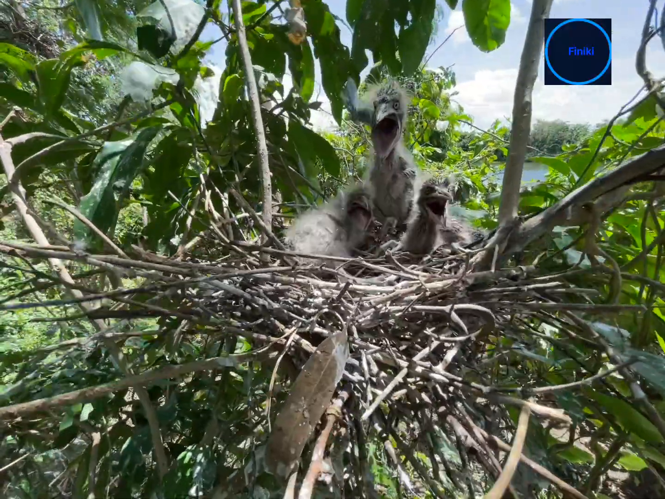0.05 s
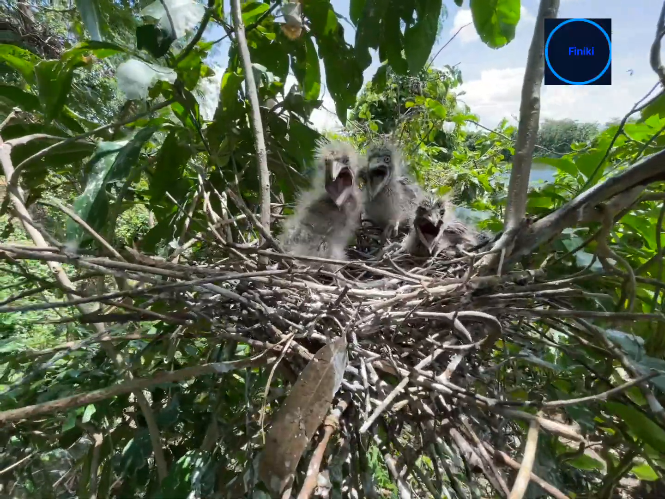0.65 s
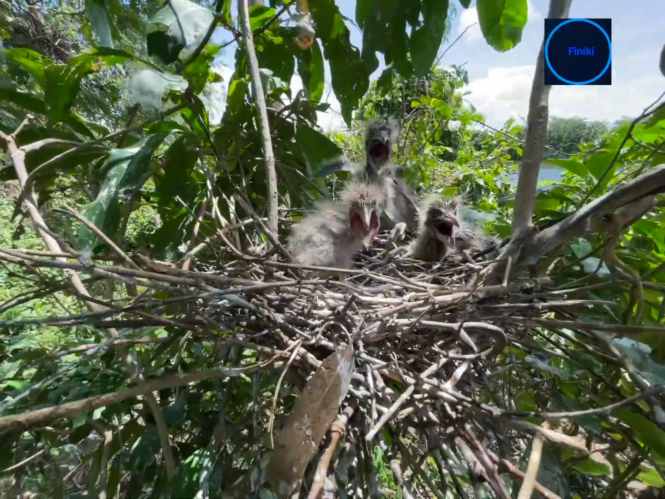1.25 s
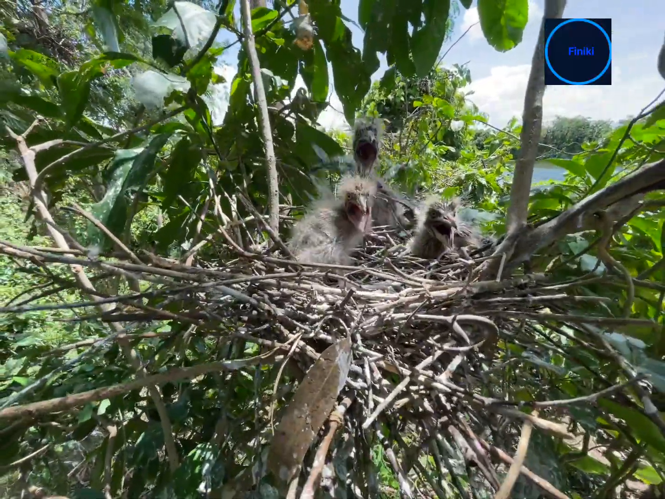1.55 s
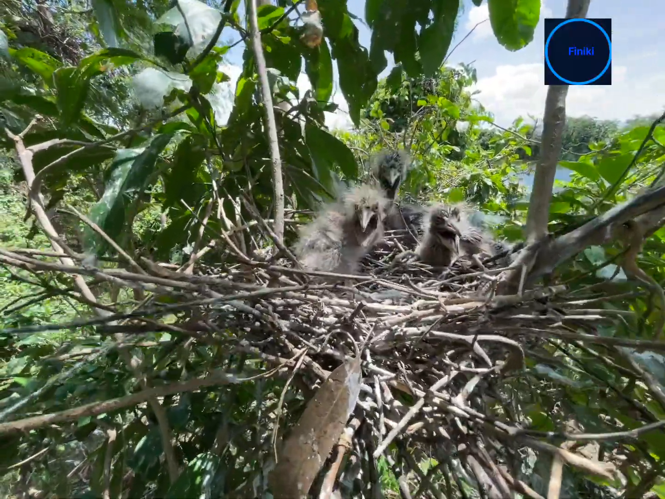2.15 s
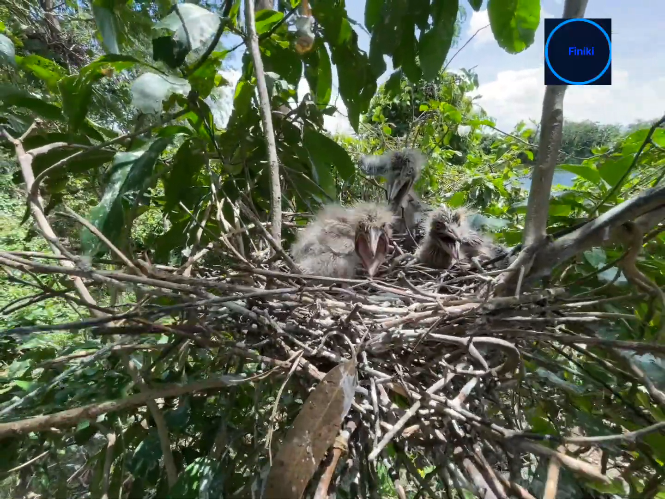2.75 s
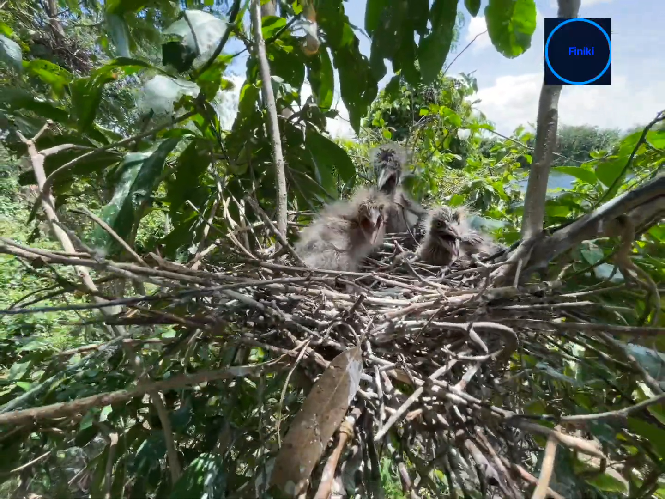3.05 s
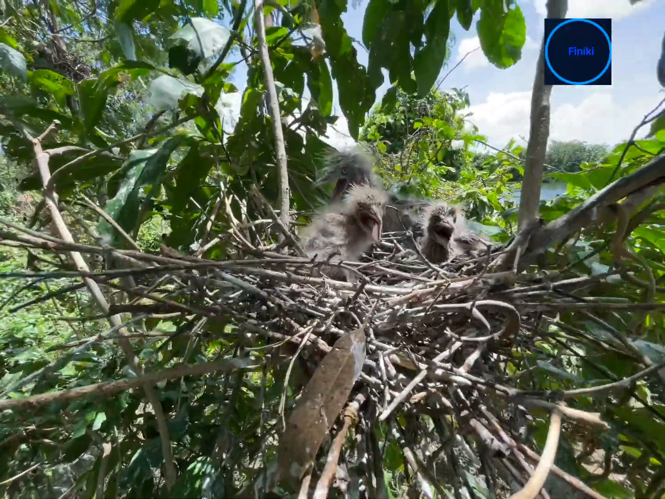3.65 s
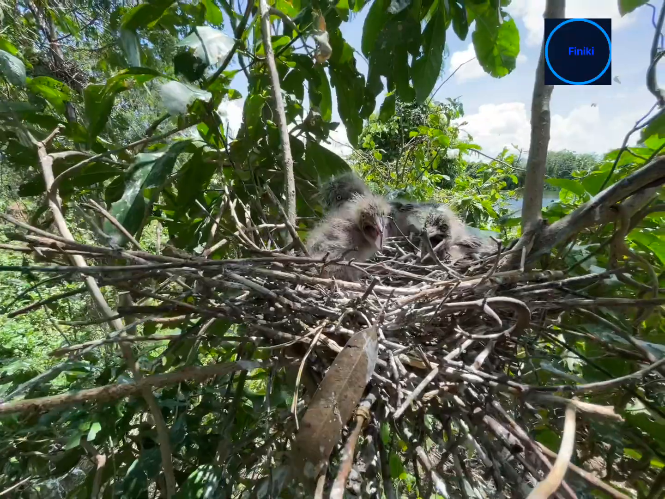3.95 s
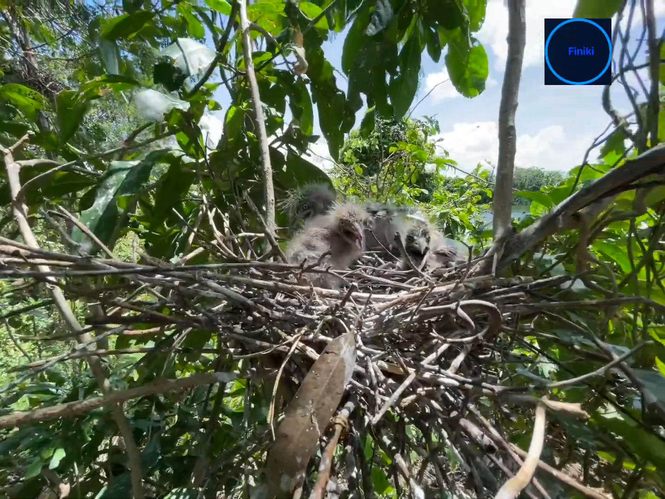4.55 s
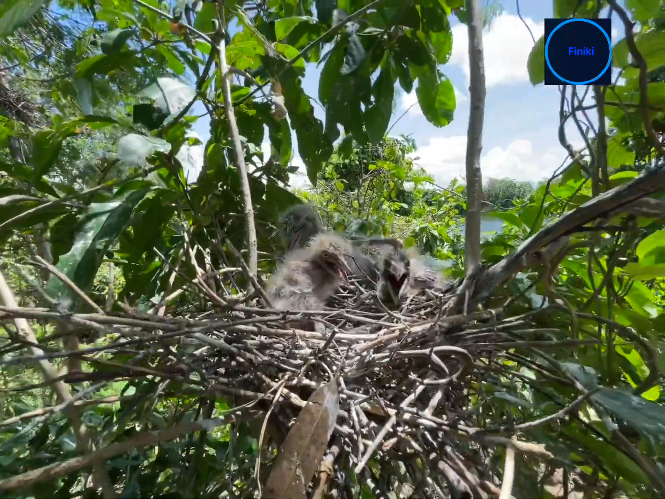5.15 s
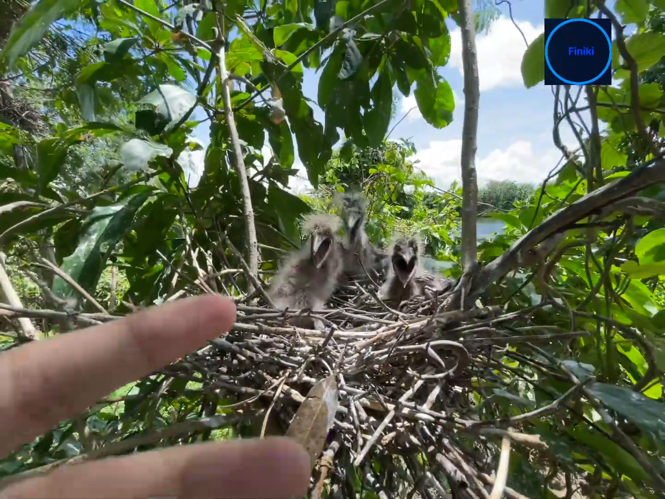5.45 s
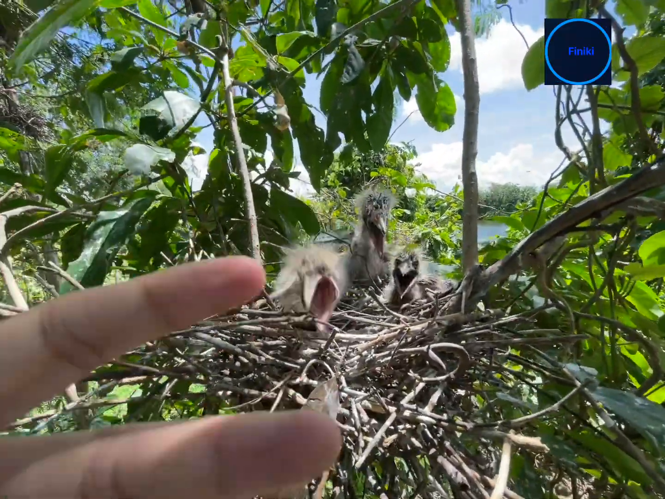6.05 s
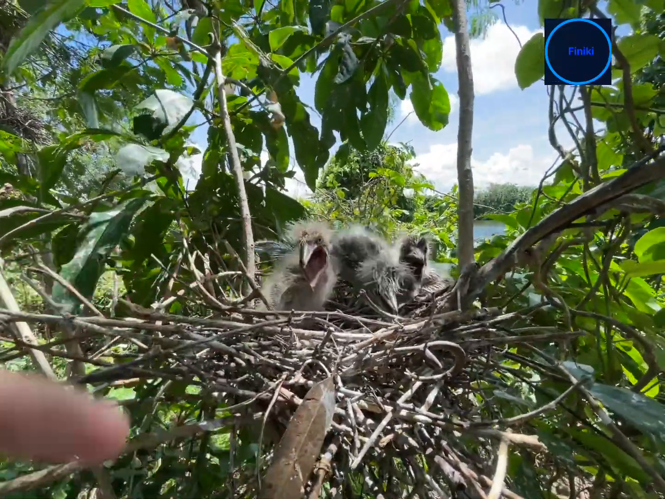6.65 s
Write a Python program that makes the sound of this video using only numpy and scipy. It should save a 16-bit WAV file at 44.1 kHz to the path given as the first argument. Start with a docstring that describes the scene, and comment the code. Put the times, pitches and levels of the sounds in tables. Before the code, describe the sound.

Heron chicks beg in a stick nest right by the microphone. One short, harsh yelp comes early; after a quiet stretch, a longer screech and a quick squawk follow near the end. Between them, twigs tick and down rustles faintly as the chicks shuffle. Soft grunts and hisses echo from a farther nest, and distant birds peep and croak over a low outdoor rumble and stirring leaves.

```python
"""A stick nest in a tree, in a heron colony. Chicks beg close by with three harsh squawks: syrinx pulses
ringing gliding throat resonances. Soft, echoing grunts and hisses, a weaker flutter, come from a farther
nest. Twigs tick and down rustles as the chicks shuffle. Farther off, other birds peep and croak
over a slowly growing low rumble and a faint stir of leaves."""
import sys
import numpy as np
from scipy import signal
from scipy.fft import rfft, irfft, next_fast_len
from scipy.io import wavfile
from scipy.ndimage import uniform_filter1d, minimum_filter1d, map_coordinates

SR = 44100
rng = np.random.default_rng(int(sys.argv[2]) if len(sys.argv) > 2 else 0)


def to_wav(sig):
    """Store sig (one row per channel, or 1-D mono) as 16-bit WAV at the path in sys.argv[1].

    Samples outside -1..1 are clipped; the rate is SR.
    """
    pcm = np.clip(np.atleast_2d(sig), -1, 1) * 32767
    pcm = np.round(pcm).astype(np.int16)
    wavfile.write(sys.argv[1], SR, pcm.T)  # frames by channels


N = 299880
RING = 512  # samples per pulse response
HZ = np.fft.rfftfreq(RING, 1 / SR)

# broadband part of rasps and twig cracks: (frequency [Hz], gain [dB])
BROADBAND = [(200, -34.5), (500, -12.5), (1200, -5.5), (2000, 2), (4200, 1), (6000, -11.5), (9000, -19),
             (16000, -42)]
# down rubbing on twigs: (frequency [Hz], gain [dB])
RUSTLE_SPECTRUM = [(1500, -31), (4000, 0.5), (7000, 1), (10000, -3), (13000, 2), (16000, -9)]
# chick movements: (time [s], length [s], level [dB])
SHUFFLES = [(0.026, 0.23, -76), (0.684, 0.088, -76), (1.281, .12, -69.5), (1.392, .35, -75),
            (1.875, 0.41, -81.5), (3.08, 0.082, -76.5), (3.27, .1, -77), (3.471, .18, -73),
            (3.62, .2, -76.5), (4.28, 0.17, -78.5), (4.636, .41, -69.5), (5.397, 0.56, -76.5),
            (6.134, 0.38, -69.5), (6.556, 0.39, -73)]


def near_chicks():
    """Three loud begging calls: yelp, screech, squawk."""
    # (time [s], length [s], level [dB], fade [dB/s], bite [dB], release [s])
    yelp_call = (0.919, 0.051, -17, -0.5, 0, 0.008)
    screech_call = (5.187, 0.16, -15, 31.5, 3.2, 0.024)
    squawk_call = (6.0485, 0.082, -18, 4, 5.5, 0.0079)
    # voice breaking between clear and rough: (time [s], pitch [Hz], roughness [0-1])
    yelp_voice = [(0.92, 498, 0.87), (.928, 399.6, 0.81), (0.949, 416.7, .9), (0.957, 384, 0.17)]
    screech_voice = [(5.188, 421, 0.094), (5.207, 446.2, 0.13), (5.215, 439, 0.91), (5.235, 464, .5),
                     (5.26, 448, .9), (5.32, 471.4, .75), (5.338, 452, .12)]
    squawk_voice = [(6.075, 408, .3), (6.10, 412, .06), (6.109, 454, .01), (6.122, 452, .01),
                    (6.13, 400, .05)]
    # three throat resonances: (start [Hz], middle [Hz], end [Hz])
    yelp_throat = [(2020, 2100, 2400), (3440, 3260, 4000), (4300, 4420, 4330)]
    screech_throat = [(2310, 2220, 2180), (3360, 3780, 3950), (5000, 5150, 5900)]
    squawk_throat = [(2284, 2100, 2240), (3450, 2870, 3200), (4450, 3900, 5000)]
    # broad colour of throat and open beak: (frequency [Hz], gain [dB])
    yelp_beak = [(250, -39), (400, -25), (700, -26.5), (1200, -20.5), (2000, -13), (3300, -0.5), (4500, -8),
                 (6500, -12.5), (9000, -18), (12000, -19.5), (13200, -29.5), (16000, -28.5)]
    screech_beak = [(300, -35), (450, -18.5), (780, -23), (1450, -17.5), (2000, -3.5), (3500, -5.5),
                    (4600, -15), (6200, -21), (7500, -27), (9500, -20), (12000, -22), (16000, -28)]
    squawk_beak = [(280, -27), (420, -23.5), (1000, -24.5), (1450, -19.5), (2100, -12.5), (3200, -3.5),
                   (4300, -9.5), (6000, -9), (7200, -18.5), (9500, -23), (12000, -15), (16000, -26)]
    yelp = loud_call(yelp_call, yelp_voice, yelp_throat, yelp_beak,
                     jitter=0.16, scatter_db=2.5, peak_db=6, width_hz=600, rasp=0.25)
    screech = loud_call(screech_call, screech_voice, screech_throat, screech_beak,
                        jitter=0.16, scatter_db=1, peak_db=10.5, width_hz=720, rasp=0.22)
    squawk = loud_call(squawk_call, squawk_voice, squawk_throat, squawk_beak,
                       jitter=0.15, scatter_db=4, peak_db=10.5, width_hz=540, rasp=0.092)
    return yelp + screech + squawk


def loud_call(call, voice, throat, beak, jitter, scatter_db, peak_db, width_hz, rasp):
    """The syrinx slaps once a cycle; roughness upsets pitch, slap timing and slap strength."""
    start_s, length_s = call[:2]
    t = np.arange(start_s, start_s + length_s, 1 / SR)
    pitch_hz, rough = curves(voice, t)
    stagger = 0.07 * rough * wobble(110, len(t))
    cycles = np.cumsum(pitch_hz * (1 + stagger)) / SR
    slaps_s = np.interp(np.arange(0.3, cycles[-1]), cycles, t)
    pitch_hz, rough = curves(voice, slaps_s)
    knots_s = np.linspace(start_s, start_s + length_s, 3)
    centres_hz = [np.interp(slaps_s, knots_s, glide) for glide in throat]
    peaks = sum(resonance(hz, width_hz * hz[:, None] / 3000) ** 2 for hz in centres_hz)
    low_cut = (HZ + 5) / (HZ + 120)
    gain = amp(along(beak, HZ) + peak_db * peaks) * low_cut
    air = rasp * rough[:, None] + 0.63 * (HZ / 10000) ** 2  # turbulence takes over the treble
    slip, force = rough * rng.standard_normal((2, len(slaps_s)))
    energy_db = effort(slaps_s, call) + 10 * np.log10(SR / pitch_hz) + scatter_db * force
    return pulse_train(slaps_s + jitter * slip / pitch_hz, gain, energy_db, air)


def effort(t, call, attack_s=0.007, attack_db=7, bite_s=0.031, release_db=7.5):
    """Call level in dB: attack, forced opening (bite), steady slope, release."""
    start_s, length_s, db, fade_db_per_s, bite_db, release_s = call
    age_s = t - start_s
    attack = np.clip(1 - age_s / attack_s, 0, 1)
    bite = 1 / (1 + (np.abs(age_s) / bite_s) ** 20)
    release = np.clip(1 - (length_s - age_s) / release_s, 0, 1)
    return db - attack_db * attack + bite_db * bite - fade_db_per_s * age_s - release_db * release


def pulse_train(times_s, gain, energy_db, air, puff_s=0.00043):
    """Each pulse rings its own response, part clean snap, part puff of air."""
    cepstrum = irfft(np.log(gain + 1e-6))
    cepstrum[:, 1:RING // 2] *= 2  # fold to minimum phase
    cepstrum[:, RING // 2 + 1:] = 0
    age_s = np.arange(RING) / SR
    puff = rng.standard_normal((len(times_s), RING)) * age_s * np.exp(-age_s / puff_s)
    puff = rfft(puff / np.linalg.norm(puff, axis=1, keepdims=True))
    air = np.clip(air, 0, 1)
    onset, fraction = np.divmod(np.maximum(times_s, 0) * SR, 1)
    fine_delay = np.exp(-2j * np.pi * HZ * fraction[:, None] / SR)
    drive = (np.sqrt(1 - air) + np.sqrt(air) * puff) * fine_delay
    rings = irfft(np.exp(rfft(cepstrum)) * drive) * np.hanning(2 * RING)[RING:]
    rings *= (amp(energy_db) / np.linalg.norm(rings, axis=1))[:, None]
    samples = onset.astype(int)[:, None] + np.arange(RING)
    return np.bincount(samples.ravel(), rings.ravel(), N)[:N]


def soft_calls():
    """From a farther nest: slow, even flutter grunts; fast, ragged flutter hisses."""
    # both: (time [s], length [s], relative level [dB], resonance start [Hz], resonance end [Hz])
    grunts = [(.276, 0.057, -63.5, 1180, 1240), (1.607, .14, -66, 1430, 1500),
              (4.141, 0.083, -55, 1442, 1580), (4.573, 0.06, -54, 1340, 1200),
              (4.634, .065, -51.5, 1460, 1540), (4.882, 0.073, -49, 1800, 1380),
              (6.552, 0.055, -62.5, 1290, 1050)]
    hisses = [(0, 0.059, -59.5, 2260, 2500), (1.29, 0.094, -59, 5200, 4800), (1.877, .1, -59, 3180, 5300),
              (2.028, 0.46, -57, 4930, 4400), (3.2, .65, -69, 3400, 3200), (4.716, .08, -61, 3950, 4300)]
    return (rasps(grunts, flutter_hz=301, rough=0.09, width_hz=480, floor_db=-18.5, fade_db_per_s=6.5)
            + rasps(hisses, flutter_hz=798, rough=0.95, width_hz=660, floor_db=-12, fade_db_per_s=14.5))


def rasps(calls, flutter_hz, rough, width_hz, floor_db, fade_db_per_s, max_pulses=250):
    """The syrinx flutters weakly into one gliding resonance, fading as the air runs out."""
    out = np.zeros(N)
    floor = amp(floor_db + along(BROADBAND, HZ))
    air = rough + 0.15 * (HZ / 5000) ** 2
    for start_s, length_s, db, start_hz, end_hz in calls:
        count = int(np.clip(length_s * flutter_hz, 4, max_pulses))
        slip = rough * rng.uniform(-0.9, 0.9, count)
        progress = np.clip((np.arange(count) + 0.5 + slip) / count, 0, 1)
        gain = resonance(start_hz + (end_hz - start_hz) * progress, width_hz) ** 2 + floor
        arch = np.sin(np.pi * progress ** 0.85) + 0.4
        age_s = length_s * progress
        energy_db = db - fade_db_per_s * age_s + 10 * np.log10(arch * SR * length_s / count)
        out += pulse_train(start_s + age_s, gain, energy_db, air)
    return out


def twigs(t60_s=0.02, crack=0.38):
    """Dry twigs crack with two broad resonances: a few sharp ticks, plus a small one per shuffle."""
    # (time [s], peak [dB], pitch [Hz])
    sharp_ticks = [(1.625, -45, 6040), (3.01, -55, 4730), (4.339, -39.5, 2046), (4.87, -46, 4150),
                   (5.653, -47.5, 6460), (6.311, -44, 2600), (6.337, -40.5, 2160), (6.427, -48, 5200)]
    small_ticks = [(start_s + length_s * rng.random(), db + 13, 5000 * 2 ** rng.uniform(-0.5, 0.5))
                   for start_s, length_s, db in SHUFFLES]
    out = np.zeros(N)
    decay = amp(-60 * np.arange(RING) / SR / t60_s)
    for start_s, db, hz in list(sharp_ticks) + small_ticks:
        modes = resonance(np.array([hz, 1.68 * hz]), width_hz=1200).sum(axis=0)
        wood = modes + crack * amp(along(BROADBAND, HZ))
        tick = irfft(rfft(rng.standard_normal(RING)) * wood) * decay
        add(out, start_s, amp(db) * tick / np.abs(tick).max())
    return out


def rustle(still_db=-92.5, flutter_db=3):
    """Each shuffle swells and dies: equal parts brushing down and tiny snaps."""
    motion = np.full(N, amp(still_db))
    for start_s, length_s, db in SHUFFLES:
        add(motion, start_s, amp(db) * unit(np.sqrt(np.hanning(int(length_s * SR)))))
    brush = unit(rush(RUSTLE_SPECTRUM, patchy_db=0.5) * amp(flutter_db * wobble(83)))
    return motion * amp(-3) * (brush + crackle())


def crackle(snaps_per_s=60, spread_db=4, t60_s=0.011):
    """Sparse snaps of dry stalks, rms 1."""
    snaps = (rng.random(N) < snaps_per_s / SR) * amp(spread_db * rng.standard_normal(N))
    grain = rng.standard_normal(RING) * amp(-60 * np.arange(RING) / SR / t60_s)
    return unit(coloured(signal.fftconvolve(snaps, grain)[:N], RUSTLE_SPECTRUM))


def peeps():
    """Clearer cries from neighbouring nests."""
    # (time [s], length [s], level [dB], start [Hz], end [Hz], roughness [ratio])
    cries = [(0.647, 0.098, -70, 2450, 2400, 0.25), (1.938, 0.013, -49.5, 3090, 2760, 0.17),
             (2.137, 0.044, -55, 1334, 1330, 0.34), (2.826, 0.033, -62.5, 2374, 2300, .78),
             (3.078, .039, -60, 2470, 2400, .6), (3.547, 0.095, -64.5, 2330, 2400, 0.1),
             (4.027, 0.074, -68, 2376, 2530, 0.8), (4.713, 0.051, -68, 3710, 4900, .4),
             (4.765, 0.024, -55.5, 3770, 2500, 1.05), (5.718, 0.093, -63.5, 2245, 1600, 1),
             (5.792, 0.046, -57.5, 2250, 2200, 0.4), (6.757, .06, -60, 3680, 4200, 0.18)]
    out = np.zeros(N)
    for start_s, length_s, db, start_hz, end_hz, rough in cries:
        add(out, start_s, amp(db) * cry(length_s, start_hz, end_hz, rough))
    return out


def chatter(level_db=-78, centre_hz=2300, count=90):
    """Far chicks cry hoarsely over one another."""
    out = np.zeros(N)
    for k, (slip, span, pitch, glide, loud) in enumerate(rng.uniform(-1.5, 1, (count, 5))):
        hz = centre_hz * 1.4 ** pitch
        sound = cry(0.18 + 0.062 * span, hz, hz * (1 + 0.26 * glide), rough=1.2)
        add(out, (k + slip) * N / SR / count, amp(level_db + 2 * loud) * sound)
    return out


def cry(length_s, start_hz, end_hz, rough, arch_hz=130, waver_hz=260):
    """One arched tone; pitch shake makes it hoarse."""
    progress, envelope = gate(length_s)
    glide_hz = start_hz + (end_hz - start_hz) * progress + arch_hz * np.sin(np.pi * progress)
    shake_hz = waver_hz * rough * wobble(700, len(progress))
    return envelope * unit(np.sin(2 * np.pi * np.cumsum(glide_hz + shake_hz) / SR))


def colony_croaks(far_db=-76, far_count=11):
    """Clear croaks over a loose beat of farther ones."""
    # (centre time [s], level [dB], top pitch [Hz])
    clear = [(.15, -72, 832), (.35, -75, 916), (1.0, -67.5, 810), (1.18, -74, 632), (1.39, -72.5, 870),
             (1.73, -71, 812), (2.09, -66, 867), (2.39, -68.5, 888), (2.515, -70, 558), (2.701, -68.5, 567),
             (2.975, -66.5, 721), (3.335, -75, 550), (3.56, -70.5, 880), (3.73, -68, 627), (4.6, -76, 598),
             (4.9, -65.5, 624), (5.69, -64, 494)]
    far = [((k + rng.random()) * N / SR / far_count, far_db, rng.uniform(550, 850))
           for k in range(far_count)]
    out = np.zeros(N)
    for centre_s, db, top_hz in list(clear) + far:
        sound = croak(top_hz)
        add(out, centre_s - len(sound) / SR / 2, amp(db) * sound)
    return out


def croak(top_hz, length_s=0.08, breath_db=-1, arch=0.33, hoarse=0.035):
    """Five shaky harmonics rise and fall in pitch, with a puff of air."""
    # throat colour: (frequency [Hz], gain [dB])
    throat = [(200, -9), (500, -0.5), (850, -4), (1200, -4.5), (1700, -5.5), (3000, -6), (8000, -55.5)]
    progress, envelope = gate(length_s)
    size = len(progress)
    hz = top_hz * (1 - arch * (2 * progress - 1) ** 2 + hoarse * wobble(500, size))
    phase = 2 * np.pi * np.cumsum(hz) / SR
    voice = sum(amp(along(throat, k * top_hz)) * np.sin(k * phase) for k in range(1, 6))
    voice = unit(voice * amp(3 * wobble(350, size)))
    air = coloured(rng.standard_normal(size), throat)
    return envelope * unit(voice + amp(breath_db) * air)


def outdoors():
    """Rumble and far noise grow slowly under the blur of leaves and colony."""
    # spectra: (frequency [Hz], gain [dB])
    rumble_spectrum = [(20, -61), (36, -40.5), (50, -11.5), (62, 0), (80, -2.5), (105, 2.5), (130, -4),
                       (165, -12.5), (250, -16.5), (500, -34.5), (1000, -77)]
    far_spectrum = [(100, -30), (200, -8), (280, 3), (500, -1), (900, -2), (1400, -6.5), (2500, -22),
                    (6000, -47)]
    leaf_spectrum = [(500, -31.5), (1200, -4.5), (1700, -3), (2400, -3), (3300, -3.5), (4500, -7.5),
                     (6000, -14), (9000, -23), (13000, -33), (16000, -49)]
    # stir of leaves and colony: (time [s], relative level [dB])
    stir = [(0.0, -62.5), (0.38, -67.5), (1.72, -65.5), (2.27, -61.5), (2.5, -65.5), (4.64, -65),
            (4.79, -63), (4.9, -62), (5.43, -61.5), (5.95, -60), (6.1, -62.5), (6.8, -58.5)]
    t = np.arange(N) / SR
    stir_db, = curves(stir, t)
    rumble = amp(-73.5 + 0.97 * t) * rush(rumble_spectrum, patchy_db=1.8)
    far = amp(-78.5 + 1.2 * t) * rush(far_spectrum, patchy_db=0.77)
    leaves = amp(stir_db - 5) * rush(leaf_spectrum, patchy_db=3)
    return rumble + far + leaves


def canopy(x, early_db, late_db, early_t60_s=0.13):
    """Near leaves scatter a quick echo, farther branches a faint tail."""
    # tail decay: (frequency [Hz], t60 [s])
    tail_t60 = [(200, 0.29), (3000, 0.33), (7000, 0.1), (15000, 0.042)]
    hz, t, noise = signal.stft(rng.standard_normal((2, SR // 3)), SR, nperseg=256)
    early = signal.istft(noise[0] * amp(-60 * t / early_t60_s), SR, nperseg=256)[1]
    late = signal.istft(noise[1] * amp(-60 * t / along(tail_t60, hz)[:, None]), SR, nperseg=256)[1]
    echo = amp(early_db) * early / np.linalg.norm(early) + amp(late_db) * late / np.linalg.norm(late)
    return x + signal.fftconvolve(x, np.pad(echo, (SR // 400, 0)))[:N]


def rush(spectrum, patchy_db):
    """Coloured noise with patches of random gain, rms 1."""
    bins = signal.stft(rng.standard_normal(N), nperseg=512)[2]
    patches = uniform_filter1d(rng.standard_normal(bins.shape), size=5, axis=0)
    patches = unit(uniform_filter1d(patches, size=12, axis=1))
    noise = signal.istft(bins * amp(patchy_db * patches), nperseg=512)[1][:N]
    return unit(coloured(noise, spectrum))


def resonance(centres_hz, width_hz):
    """One curve of height 1 per centre."""
    return 1 / np.sqrt(1 + (2 * (HZ - centres_hz[:, None]) / width_hz) ** 2)


def gate(length_s):
    """Progress 0-1 through a call, and its nearly level envelope with abrupt start and end."""
    progress = np.linspace(0, 1, int(length_s * SR))
    return progress, unit(np.abs(np.sin(np.pi * progress)) ** 0.091)


def wobble(knots_per_s, size=N):
    """Smooth random curve."""
    knots = rng.standard_normal(int(size * knots_per_s / SR) + 4)
    return map_coordinates(knots, [np.arange(size) * knots_per_s / SR])


def filtered(x, gain):
    """Apply gain(hz), zero phase."""
    size = next_fast_len(len(x) + 8192)
    return irfft(rfft(x, size) * gain(np.fft.rfftfreq(size, 1 / SR)), size)[:len(x)]


def coloured(x, spectrum):
    """Filter by (frequency [Hz], gain [dB]) points."""
    return filtered(x, lambda hz: amp(along(spectrum, hz)))


def along(points, hz):
    """Read (frequency [Hz], value) points on a log axis."""
    knots_hz, values = np.transpose(points)
    return np.interp(np.log(hz + 1), np.log(knots_hz + 1), values)


def curves(rows, t):
    """Read each value column at times t."""
    knots_s, *columns = np.transpose(rows)
    return [np.interp(t, knots_s, column) for column in columns]


def add(track, start_s, sound):
    """Mix a sound into the track."""
    start = int(np.clip(round(start_s * SR), 0, N))
    track[start:start + len(sound)] += sound[:N - start]


def amp(db):
    """Decibels to gain."""
    return 10 ** (np.asarray(db) / 20)


def unit(x):
    """Scale to rms 1."""
    return x / np.sqrt(np.mean(x ** 2) + 1e-20)


def scene():
    """Loud calls close and nearly dry; soft calls and colony farther off, echoing in the trees."""
    nest = canopy(near_chicks() + twigs(), early_db=-19.5, late_db=-41, early_t60_s=0.051)
    soft = amp(-1.5) * canopy(soft_calls(), early_db=-6, late_db=-18, early_t60_s=0.06)
    high_cries = canopy(peeps() + chatter(), early_db=-2.5, late_db=-9.5)
    low_cries = canopy(colony_croaks(), early_db=-9, late_db=-14)
    return (nest + soft + high_cries + low_cries + rustle() + outdoors())[None]


def record(dry, ceiling=0.62, top_hz=15850):
    """Peak limiter, then a steep low-pass."""
    needed = ceiling / np.maximum(np.abs(dry[0]), ceiling)
    gain = uniform_filter1d(minimum_filter1d(needed, size=89), size=89)
    return filtered(dry[0] * gain, lambda hz: 1 / (1 + (hz / top_hz) ** 200))[None]


dry = scene()
out = record(dry)
to_wav(out)
```